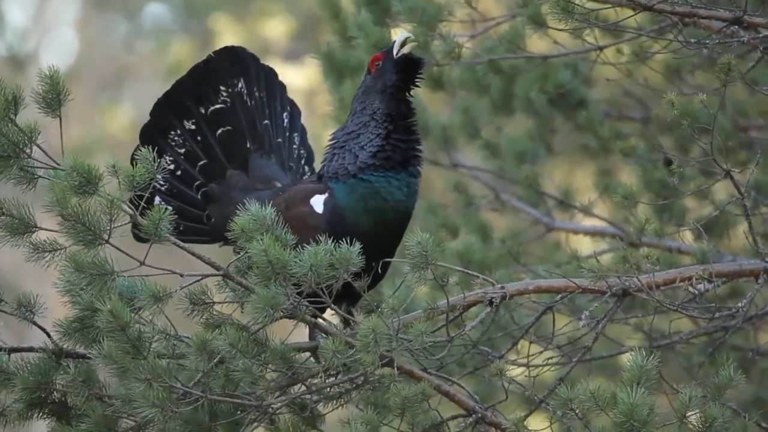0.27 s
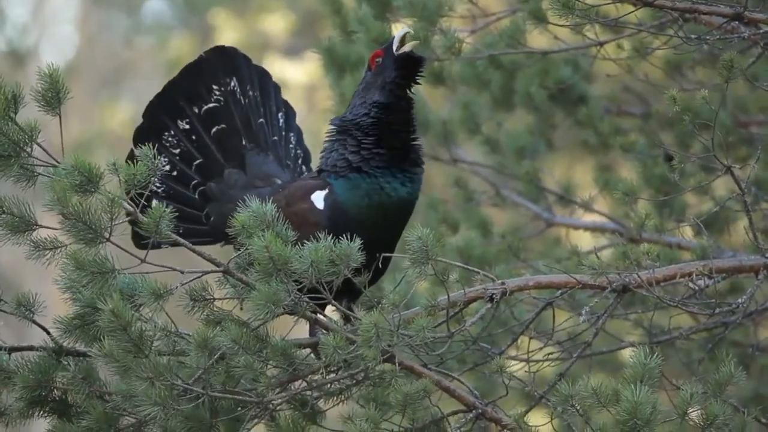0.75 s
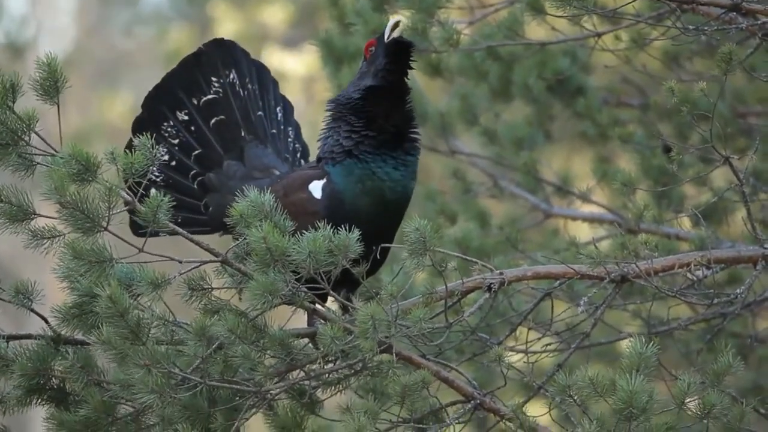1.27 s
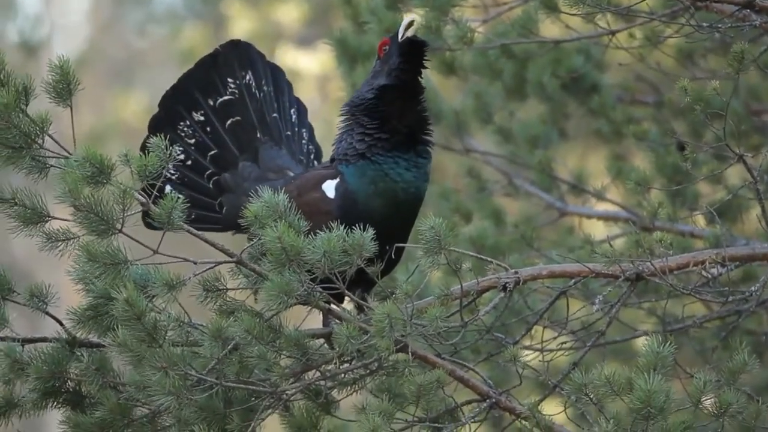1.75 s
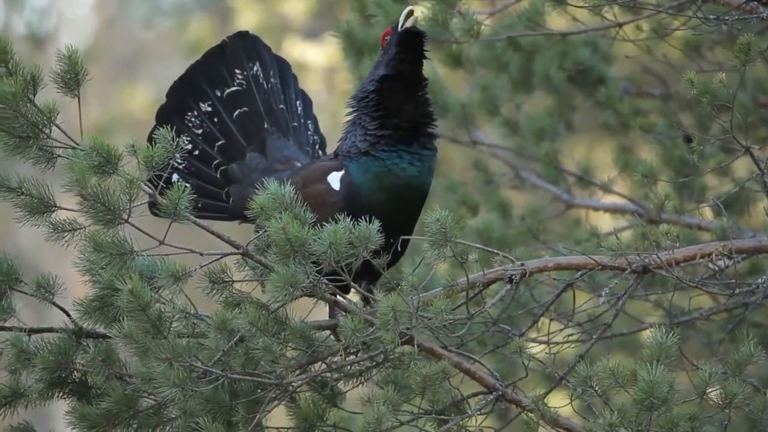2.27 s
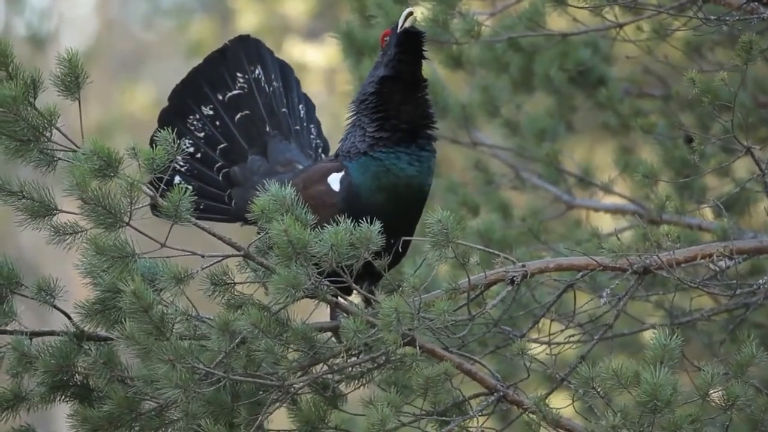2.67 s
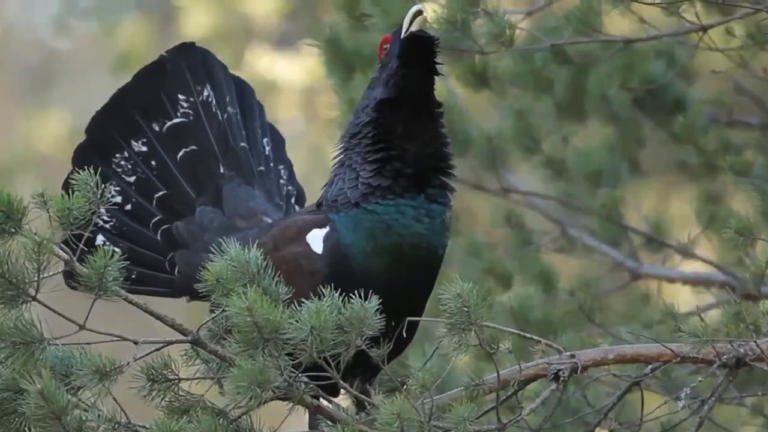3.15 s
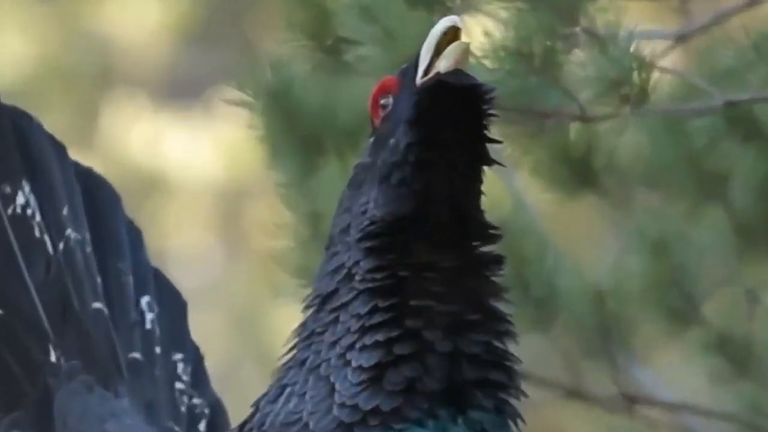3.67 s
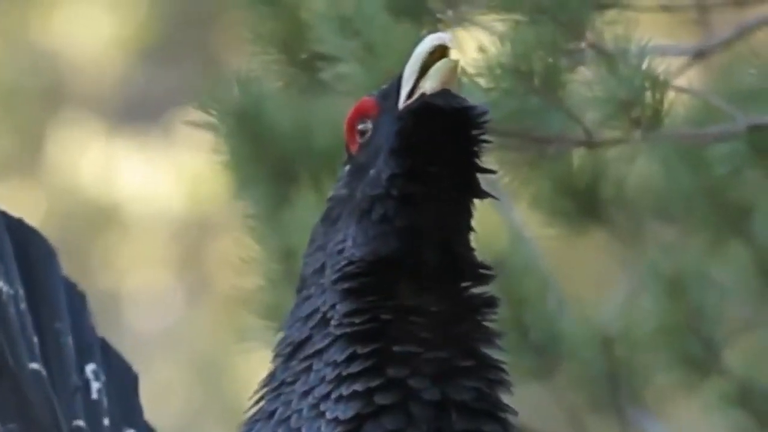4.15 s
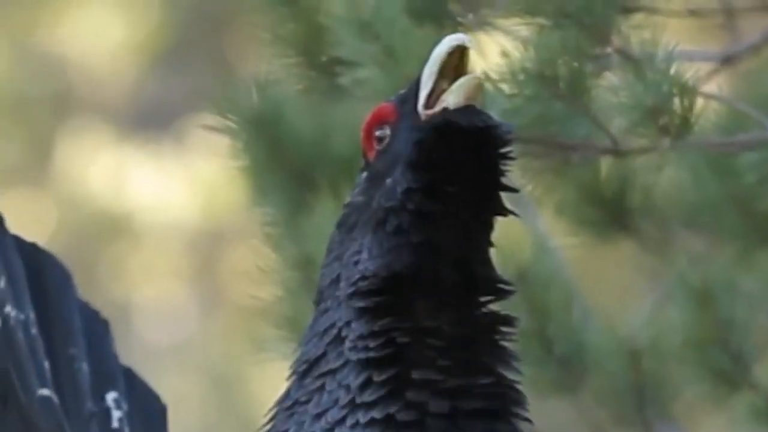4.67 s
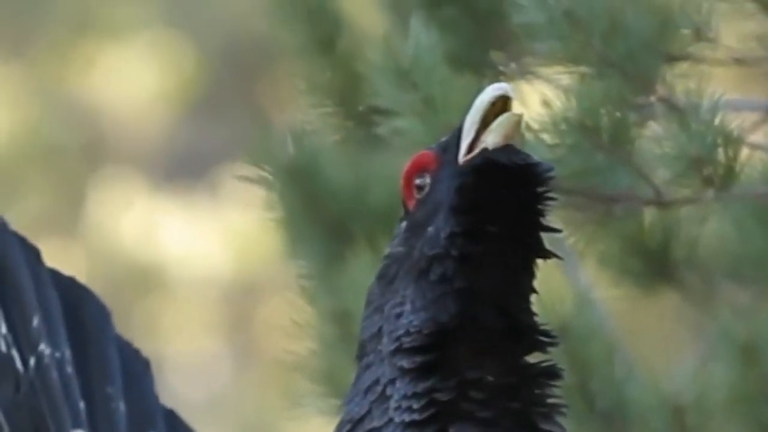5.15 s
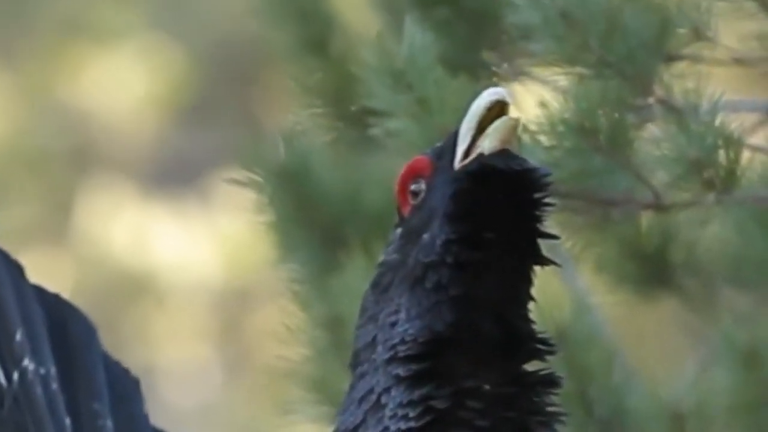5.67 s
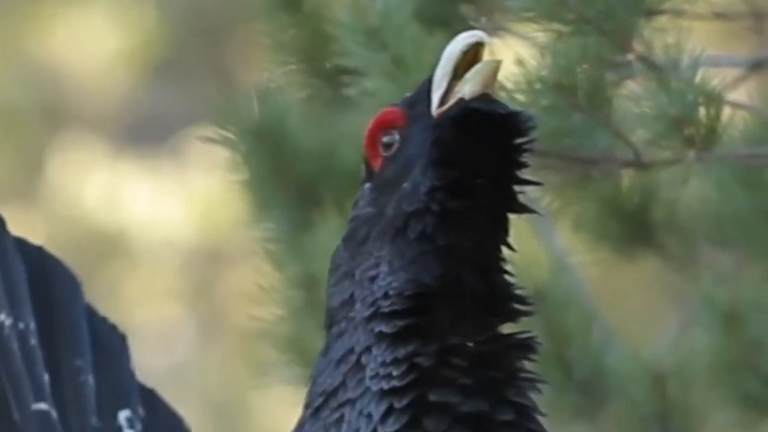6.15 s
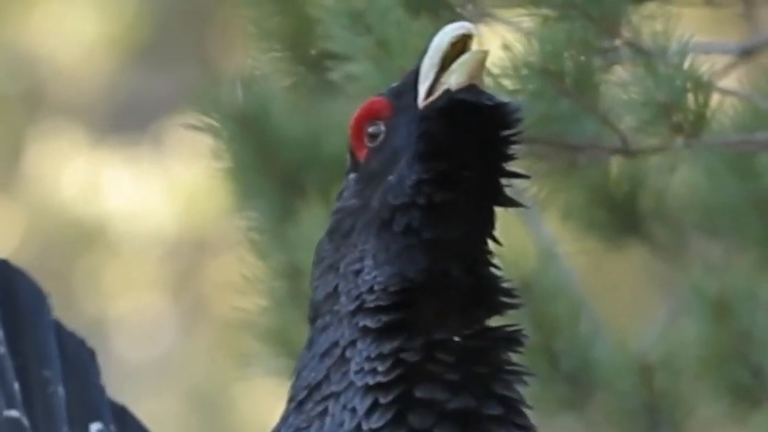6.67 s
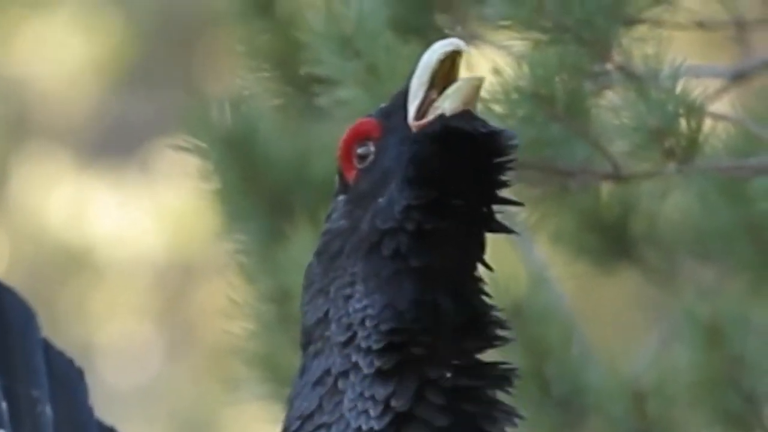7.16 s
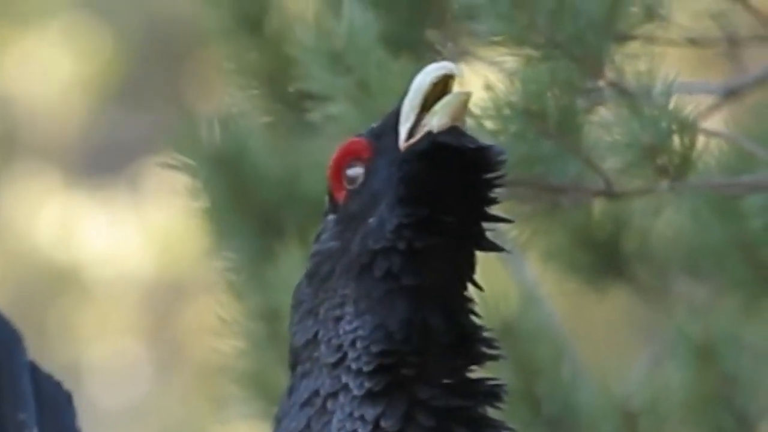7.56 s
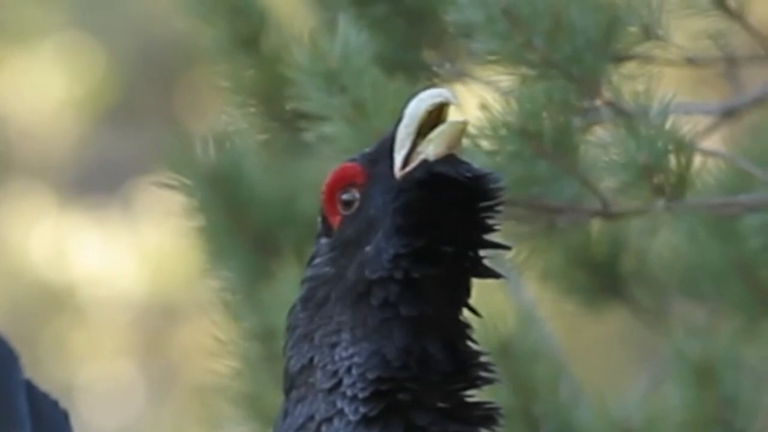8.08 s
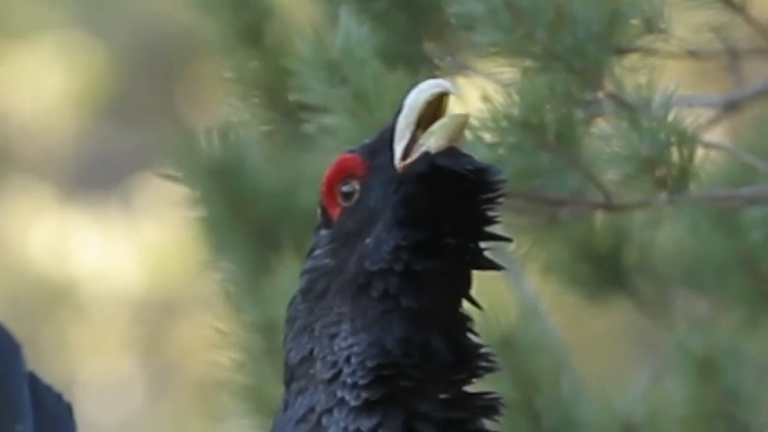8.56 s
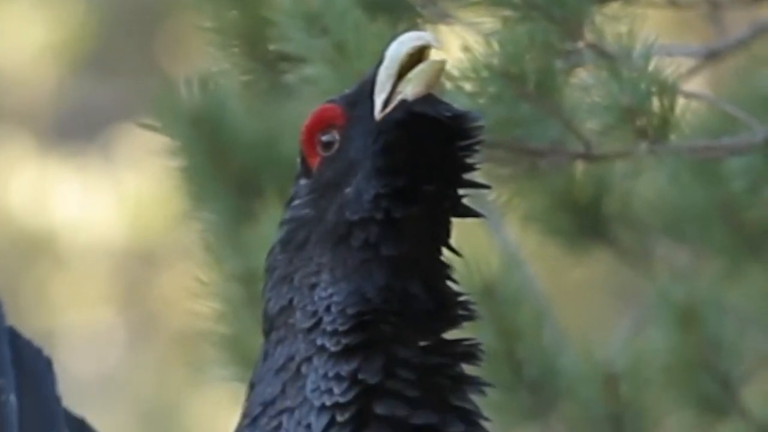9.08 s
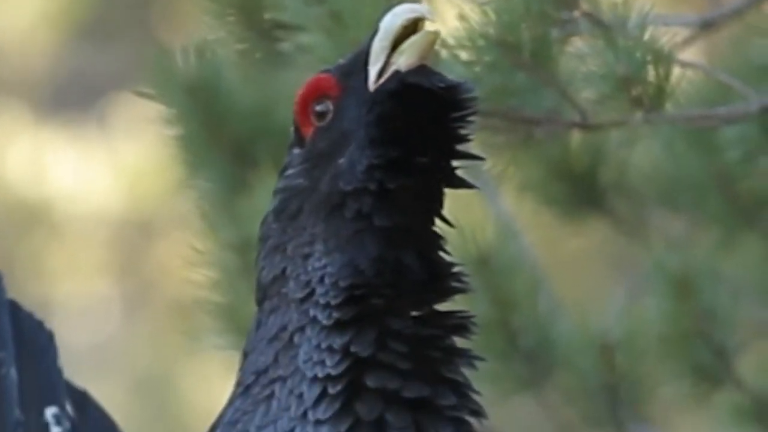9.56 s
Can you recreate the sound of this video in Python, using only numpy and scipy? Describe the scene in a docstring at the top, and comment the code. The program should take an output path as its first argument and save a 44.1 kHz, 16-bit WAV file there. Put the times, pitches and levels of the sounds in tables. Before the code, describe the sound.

Very short wooden-sounding knocks come in pairs from a displaying grouse, about a sixth of a second between knocks and one to two seconds between pairs. Early on, breathy hollow air rustles faintly between two pairs. The snaps grow louder through the middle, then the seventh pair is softer. One close microphone also picks up quiet hiss, low wind, occasional dull bumps and faint ticks, with little echo.

```python
"""One microphone hears a large grouse on a pine branch, over a steady hiss and a soft moan of wind near 300 Hz.
From the first pair of clicks its airy wheeze, filtered noise, lasts until just before the second pair.
Each snap in the throat rings the windpipe as decaying sines, with a bright crack of noise.
Faint ticks, short noise bursts, fall between and after the pairs; wind rumbles and thuds on the capsule.
The last pair is softer than the one before; then close ticks and a last thud remain."""
import sys
import numpy as np
from scipy import signal
from scipy.fft import rfft, irfft
from scipy.io import wavfile

SR = 44100
rng = np.random.default_rng(int(sys.argv[2]) if len(sys.argv) > 2 else 0)


def unload_wav(signal):
    """Save mono or channel-first audio to the path in sys.argv[1] as 16-bit WAV at rate SR, clipped to [-1, 1]."""
    wavfile.write(
        sys.argv[1],
        SR,
        np.round(np.clip(np.atleast_2d(signal).T, -1, 1) * 32767).astype(np.int16),
    )


N = 433062

# steady hiss, spectrum before scaling to HISS_DB: pitch_hz, level_db (amplitude)
HISS_SPECTRUM = [(71, -12), (120, -0.5), (201, -4), (343, -9.5), (477, -7), (815, -9.5), (904, -9.5),
                 (1180, -10.5), (2150, -11.5), (8360, -12), (12600, -7), (15500, -10), (16500, -19.5)]
HISS_DB = -64   # rms
TOP_CUT_HZ = 16800

# low wind rumble at the capsule, rms: time_s, level_db
WIND_RUMBLE = [(0.0, -80), (0.49, -76), (0.79, -64), (1.56, -70.5), (2.0, -80), (2.62, -77), (3.09, -65),
               (3.36, -68), (3.69, -72), (4.62, -69), (5.74, -70), (5.91, -59), (6.12, -76), (6.7, -69),
               (7.16, -70), (7.36, -69.5), (7.93, -76), (9.16, -80), (9.49, -73), (9.82, -72)]
# soft moan of wind near 300 Hz, rms: time_s, level_db
WIND_MOAN = [(0.0, -73.5), (0.45, -79), (0.7, -68), (1.25, -67.5), (1.42, -76), (1.7, -69.5), (2.2, -83.5),
             (2.76, -71.5), (3.11, -77), (3.4, -69), (3.65, -77.5), (4.38, -69.5), (4.52, -85), (4.9, -66),
             (5.1, -63), (5.38, -78.5), (5.62, -69), (5.87, -75.5), (6.45, -69.5), (6.73, -70),
             (7.3, -85.5), (7.85, -71.5), (8.21, -80), (8.56, -71.5), (8.8, -85), (9.24, -69.5),
             (9.46, -78), (9.66, -67), (9.82, -80)]
# strongest thuds of wind on the microphone: centre_s, level_db
WIND_THUDS = [(1.102, -54), (1.474, -48.5), (1.672, -45), (3.013, -52), (3.194, -54), (3.239, -54),
              (3.316, -55), (4.45, -56), (4.625, -53.5), (5.506, -51.5), (5.856, -57), (6.0, -51),
              (6.615, -53), (7.22, -53), (9.765, -56)]
THUD_HZ, THUD_CYCLES = 39, 0.56   # pitch; half-width of its bell envelope, in cycles

# air in the windpipe, rms: time_s, hollow_db, rustle_db, sibilance_db
WHEEZE_LEVELS = [(0.68, -85, -76, -65), (0.75, -71, -71.5, -56.5), (0.83, -71, -69, -61),
                 (0.91, -62, -66, -61.5), (1.1, -74, -71, -68), (1.15, -63, -65.5, -65),
                 (1.33, -73.5, -71.5, -62.5), (1.55, -80, -75, -68), (1.71, -67, -69, -64),
                 (1.76, -91, -90, -78)]
# resonances that make the wheeze hollow: pitch_hz, width_hz, level_db
WINDPIPE_RESONANCES = [(366, 16, 4), (612, 84, -4.5), (928, 47, -7)]

# faint ticks, peak level: start_s, level_db, pitch_hz, width_hz
FAINT_TICKS = [(.866, -52, 600, 900), (1.144, -45.5, 1190, 1490), (1.1433, -46, 12500, 6000),
               (1.332, -49.5, 1940, 900), (1.436, -53, 1900, 1500), (1.628, -44.5, 1820, 1600),
               (2.005, -44, 1280, 900), (2.6784, -53, 12500, 6000), (2.683, -41, 12300, 6040),
               (2.993, -49, 500, 800), (4.128, -59, 500, 900), (8.565, -47, 1330, 910),
               (8.606, -56, 810, 910), (9.2384, -49, 12500, 6000), (9.2426, -43, 12500, 6000)]
TICK_T60_S = 0.019   # of the noise that feeds the resonators

# throat snaps, in pairs: start_s, throat_shape, extra_crack_db, strength_db, lowest_tone_hz,
# upper_stretch (ratio), damping_share (ratio), extra_db of the fourth and fifth upper tones
# (near 2.8 and 3.1 kHz), of the fixed group led by 3.5 kHz, and of the three fixed groups above it
THROAT_SNAPS = [(0.624, "tight open", 0, -20.5, 400, 1.001, 0.95, -1, 2, 2.5, -0.8),
                (0.7982, "firm shut", -13, -28.5, 390, 0.9, 0.8, -6, -19, -9, -13),
                (1.8127, "loose open", -1, -17.5, 364, 1.001, 0.99, 2, 1.3, -7, 0.5),
                (1.9733, "loose shut", 0, -25, 348, 0.97, 0.91, 8, -0.5, 0.1, -1),
                (2.881, "firm open", -3, -12.5, 346, 1.03, 0.83, -12, 1.5, 16, 1.5),
                (3.0493, "firm shut", -3.5, -16.5, 338, 0.99, 0.9, 1.5, -5, -2, 2),
                (4.9442, "firm open", 0.1, -12, 351, 1.03, 0.91, 1.5, -4, 3, 0.8),
                (5.11, "firm shut", -2, -15.5, 320, 1.003, 0.94, 2.5, -0.6, -3, 0.5),
                (5.894, "firm open", 0, -11, 352, 0.995, 0.87, 2.3, 3.5, -5, -0.9),
                (6.0502, "firm shut", 3, -14.5, 350, 1.007, 1.12, 1.5, 3.5, -1, 1),
                (6.934, "firm open", 2, -12.5, 356, 1.02, 0.99, 6.5, -1.5, 6, 0.1),
                (7.1081, "firm shut", 2, -15.5, 317, 1.006, 1.01, 0, 0, 1, -0.5),
                (8.373, "loose open", 0.3, -17, 367, 1.014, 0.99, 1, 0.2, 10, -0.5),
                (8.5328, "loose shut", -1, -24, 350, 0.98, 0.86, -1, -2, 0.1, -1)]
# throat shapes, levels below the strength of the snap: five upper tones (pitch_hz, level_db); damping_s;
# level_db of the six fixed groups; level_db of the crack's lower and upper group; a faint ring beside it
# (offset_s, level_db), earlier if the offset is negative
THROAT_SHAPES = { "tight open": ([(1550, -7), (2270, -9.5), (2650, -20), (2770, -13.5), (3050, -27)],
                 0.024, [-12.5, -13.5, -20, -19, -12, -9.5], [-12.5, -12], (0.03, -29)),
                 "loose open": ([(1445, -11.5), (2175, -15), (2630, -79), (2685, -12.5), (3196, -4)],
                 0.032, [-12.5, -11.5, -28, -58, -13.5, -16], [-16, -11.5], (0.019, -22)),
                 "loose shut": ([(1443, -13.5), (2300, -21.5), (2620, -12.5), (3000, -27), (3060, -4)],
                 0.039, [-11.5, -11, -13.5, -44, -32.5, -16], [-22.5, -11.5], (-0.026, -15)),
                 "firm open": ([(1518, -11.5), (1860, -13.5), (2650, -22), (2770, -16.5), (3180, -12)],
                 0.027, [-13.5, -17.5, -34, -15.5, -8, -15], [-11.5, -9.5], (0.024, -28.5)),
                 "firm shut": ([(1460, -28.5), (2095, -21.5), (2560, -14), (2865, -11.5), (3095, -6.5)],
                 0.021, [-14.5, -18, -19, -36, -20, -16.5], [-18.5, -13.5], (-0.027, -21))}
# each tone's share of the damping time, lowest to top: share (ratio)
TONE_DAMPING_SHARES = [1.063, 1.3, 0.91, 1.4, 1.28, 0.85]
# six groups of windpipe tones that stay in place: pitch_hz, level_db, t60_s
FIXED_TONE_GROUPS = [
    [(221, 6, 0.022), (122, -0.5, 0.023)],
    [(846, -5.5, 0.051), (1134, -7, 0.019), (1446, -11.5, 0.066), (477.5, 3, 0.028)],
    [(3550, -1, 0.033), (2550, -24, 0.05), (1890, -22, 0.11)],
    [(4110, -4.5, 0.033), (3700, -14, 0.021)],
    [(4826, -8, 0.034)],
    [(5384, -5, 0.018), (5440, -11, 0.034), (5780, -13, 0.026)],
]
# resonances that colour the crack, a lower and an upper group: pitch_hz, width_hz, level_db
CRACK_RESONANCES = [
    [(7900, 440, -6), (9040, 360, -9), (9600, 370, -13.5), (9720, 960, -16.5)],
    [(10300, 100, -3), (11640, 560, -3.5), (12500, 350, -16), (12100, 520, 4), (13080, 170, 8),
     (13950, 390, 1.5), (14900, 500, -12), (14640, 190, -1)],
]
# decay of the crack's noise, shorter when the throat shuts: throat end, t60_s
CRACK_DECAYS = {"open": 0.029, "shut": 0.023}
# tones of the faint ring beside each snap: pitch_hz, level_db, t60_s
FAINT_RING_TONES = [(344, -1.5, 0.044), (840, -11.5, 0.037), (1480, -17, 0.024), (3000, -1, 0.01),
                    (3350, -7, 0.009)]
LOW_RISE_S, BODY_RISE_S, SNAP_RISE_S = 0.0038, 0.0037, 0.00012   # the low tones swell slowly
FRONT_HZ, FRONT_DB, FRONT_T60_S = 2970, 4, 0.0086   # blunt front; level above the third upper tone
POCKET_HZ, POCKET_WIDTH_HZ = 4390, 330   # a side pocket of the throat swallows this band


def amp(db):
    """Decibels to gain."""
    return 10 ** (np.asarray(db) / 20)


def unit(x):
    """Scale to rms 1."""
    return x / np.sqrt(np.mean(x ** 2) + 1e-20)


def curves(rows):
    """Level columns as sample-rate curves, -150 dB outside the table."""
    s, *columns = np.transpose(rows)
    time_s = np.arange(N) / SR
    return [np.interp(time_s, s, column, left=-150, right=-150) for column in columns]


def band(x, low_hz, high_hz):
    """Band-pass."""
    return signal.sosfilt(signal.butter(2, [low_hz, high_hz], "band", fs=SR, output="sos"), x)


def resonances(x, table):
    """Parallel two-pole resonators of alternating sign; a wider one rings shorter."""
    out = 0
    for k, (hz, width_hz, db) in enumerate(table):
        radius = np.exp(-np.pi * width_hz / SR)
        numerator = [(1 - radius ** 2) / 2, 0, (radius ** 2 - 1) / 2]
        denominator = [1, -2 * radius * np.cos(2 * np.pi * hz / SR), radius ** 2]
        out = out + (-1) ** k * amp(db) * signal.lfilter(numerator, denominator, x)
    return out


def flutter(rate_hz, depth_db):
    """Random gain from noise low-passed at the rate, with an rms depth in dB."""
    slow = signal.sosfilt(signal.butter(2, rate_hz, fs=SR, output="sos"), rng.standard_normal(N))
    return amp(depth_db * unit(slow))


def add(out, s, sound):
    """Mix a short sound in at a time."""
    i = round(s * SR)
    out[i:i + len(sound)] += sound[:N - i]


def hiss():
    """Steady noise of forest air and preamplifier, shaped in frequency."""
    hz = np.maximum(np.arange(N // 2 + 1) * SR / N, 20)
    points_hz, points_db = np.transpose(HISS_SPECTRUM)
    shape = amp(np.interp(np.log(hz), np.log(points_hz), points_db))
    spectrum = rfft(rng.standard_normal(N)) * shape
    return amp(HISS_DB) * unit(irfft(spectrum, N))


def wind_thuds():
    """Single bumps of wind on the capsule, each a push and its rebound."""
    out = np.zeros(N)
    t = np.arange(SR // 10) / SR - .05   # zero at the centre of the thud
    cycles = THUD_HZ * t
    thud = -np.sin(2 * np.pi * cycles) * np.exp(-(cycles / THUD_CYCLES) ** 2)
    for s, db in WIND_THUDS:
        add(out, s + t[0], amp(db) * thud)
    return out


def wind():
    """Lumpy low noise on the capsule with single thuds, and resonant noise as a soft moan above them."""
    (rumble_db,), (moan_db,) = curves(WIND_RUMBLE), curves(WIND_MOAN)
    air = rng.standard_normal((2, N))
    rumble = unit(band(air[0], 17, 74) * flutter(20, 3.8))
    moan = unit(resonances(air[1], [(299, 138, 0)]) * flutter(10.6, 2.0))
    return amp(rumble_db) * rumble + amp(moan_db) * moan + wind_thuds()


def wheeze():
    """Turbulent air: hollow in the windpipe resonances, rustling in the middle, hissing at the beak."""
    hollow_db, rustle_db, sibilance_db = curves(WHEEZE_LEVELS)
    air = rng.standard_normal((3, N))
    hollow = unit(resonances(air[0], WINDPIPE_RESONANCES))
    rustle = unit(band(air[1], 1060, 3060) * flutter(34, 2.1))
    beak_air = resonances(air[2], [(9100, 7000, -1.5), (13800, 2700, 5.0)])
    sibilance = unit(beak_air * flutter(32, 1.5))
    return amp(hollow_db) * hollow + amp(rustle_db) * rustle + amp(sibilance_db) * sibilance


def ticks():
    """Tiny decaying noise bursts, resonated round a centre pitch."""
    out, t = np.zeros(N), np.arange(SR // 25) / SR
    for s, db, hz, width_hz in FAINT_TICKS:
        burst = rng.standard_normal(len(t)) * amp(-60 * t / TICK_T60_S)
        for _ in range(2):   # twice, for steep edges
            burst = resonances(burst, [(hz, width_hz, 0)])
        add(out, s, amp(db) * burst / abs(burst).max())
    return out


def tone(t, hz, db, t60, rise):
    """A ring that swells while the snap feeds it, then dies ever faster as the throat closes."""
    rates_hz = rng.uniform(40, 160, (3, 1))
    phases = rng.uniform(0, 2 * np.pi, (3, 1))
    # soft walls make the tail waver in level and phase, fully from 10 ms on
    waver_depth = .035 * hz ** .25 * np.minimum(t / .01, 1)
    waver = waver_depth * np.sin(2 * np.pi * rates_hz * t + phases).sum(axis=0)
    swell = (1 - np.exp(-t / rise)) ** 2
    envelope = amp(db - 60 * (t / t60) ** 1.278) * swell
    # negative: it starts as a suction
    return -envelope * (1 + waver) * np.sin(2 * np.pi * hz * t + waver)


def windpipe_ring(t, shape, low_hz, stretch, damping, top_db, side_db, bright_db):
    """Windpipe tones set ringing by one snap: moving tones, fixed groups and a blunt front, less one band."""
    upper, t60, groups_db, _, _ = THROAT_SHAPES[shape]
    tones = [(low_hz, 0)] + [(stretch * hz, db) for hz, db in upper]
    extras_db = [0] * 4 + top_db
    rises = [LOW_RISE_S] + 5 * [SNAP_RISE_S]
    ring = np.zeros(len(t))
    for (hz, db), extra_db, rise, share in zip(tones, extras_db, rises, TONE_DAMPING_SHARES):
        ring += tone(t, hz, db + extra_db, share * damping * t60, rise)

    group_extras_db = [0, 0, side_db] + 3 * [bright_db]
    group_rises = 2 * [BODY_RISE_S] + 4 * [SNAP_RISE_S]
    for group, group_db, extra_db, rise in zip(FIXED_TONE_GROUPS, groups_db, group_extras_db, group_rises):
        for hz, db, decay in group:
            ring += tone(t, hz, db + group_db + extra_db, decay, rise)

    third_upper_db = upper[2][1]
    ring += tone(t, FRONT_HZ, third_upper_db + FRONT_DB, FRONT_T60_S, SNAP_RISE_S)
    pocket = signal.iirnotch(POCKET_HZ, POCKET_HZ / POCKET_WIDTH_HZ, fs=SR)
    return signal.lfilter(*pocket, ring)


def bright_crack(t, shape, extra_db):
    """A decaying noise burst coloured by two groups of high resonances."""
    throat_end = shape.split()[-1]
    burst = rng.standard_normal(len(t)) * amp(-60 * t / CRACK_DECAYS[throat_end])
    out = np.zeros(len(t))
    for db, group in zip(THROAT_SHAPES[shape][3], CRACK_RESONANCES):
        crack = resonances(burst, group)
        out += amp(db + extra_db) * crack / abs(crack).max()
    return out


def snaps():
    """Each snap rings the windpipe tones of its throat shape, cracks, and has a faint ring beside it."""
    out, t = np.zeros(N), np.arange(SR // 10) / SR
    for s, shape, extra_crack_db, db, low_hz, stretch, damping, *top_db, side_db, bright_db in THROAT_SNAPS:
        ring = windpipe_ring(t, shape, low_hz, stretch, damping, top_db, side_db, bright_db)
        crack = bright_crack(t, shape, extra_crack_db)
        add(out, s, amp(db) * (ring + crack))
        faint_s, faint_db = THROAT_SHAPES[shape][4]
        faint_ring = sum(tone(t, hz, db + faint_db + tone_db, decay, LOW_RISE_S)
                        for hz, tone_db, decay in FAINT_RING_TONES)
        add(out, s + faint_s, faint_ring)
    return out


def scene():
    """Everything reaches one microphone, the same on both channels."""
    mono = hiss() + wind() + wheeze() + ticks() + snaps()
    return np.tile(mono, (2, 1))


def record(dry):
    """The top is cut steeply, at least 70 dB down from TOP_CUT_HZ upward."""
    return signal.sosfilt(signal.cheby2(14, 70, TOP_CUT_HZ, fs=SR, output="sos"), dry)


dry = scene()
out = record(dry)
unload_wav(out)
```